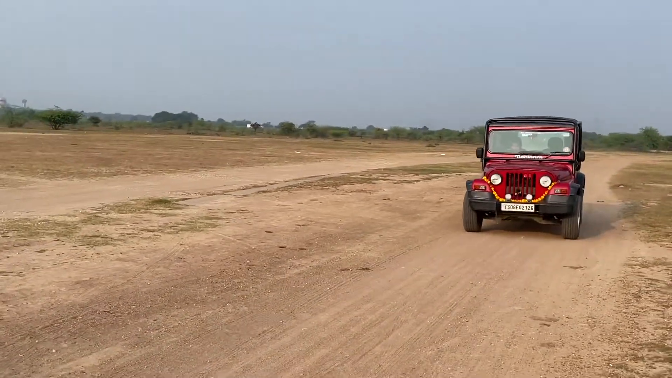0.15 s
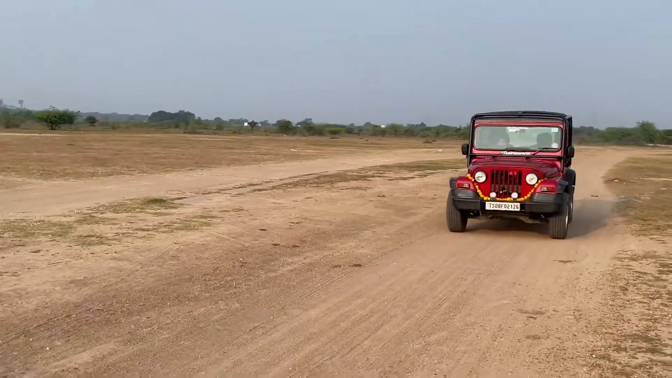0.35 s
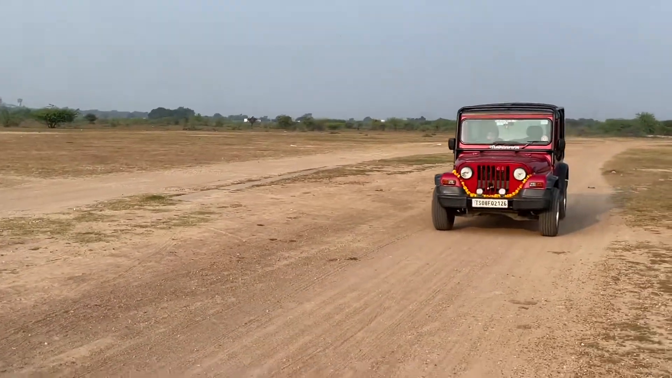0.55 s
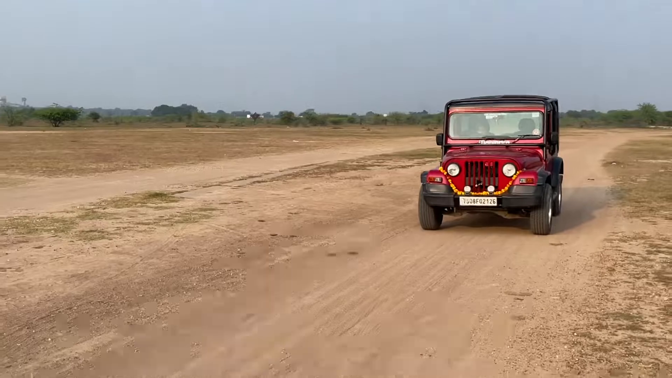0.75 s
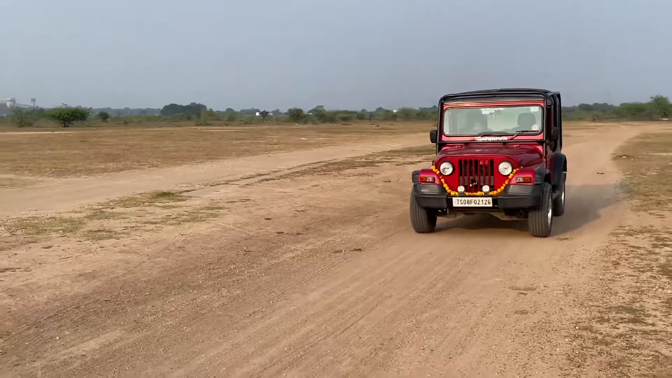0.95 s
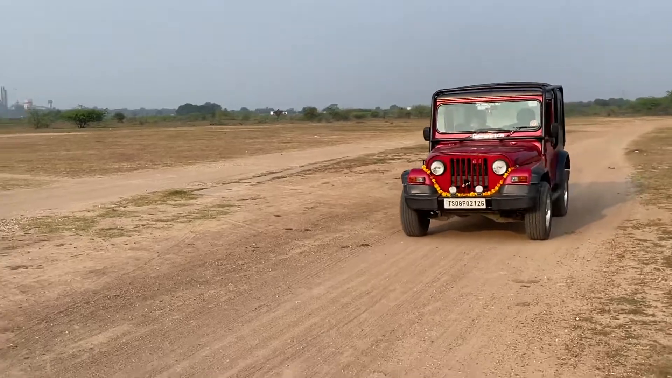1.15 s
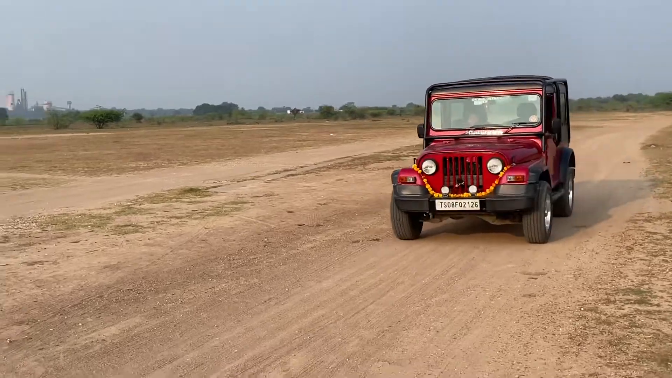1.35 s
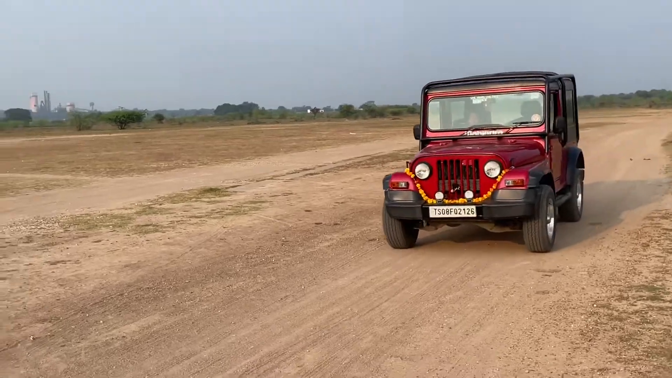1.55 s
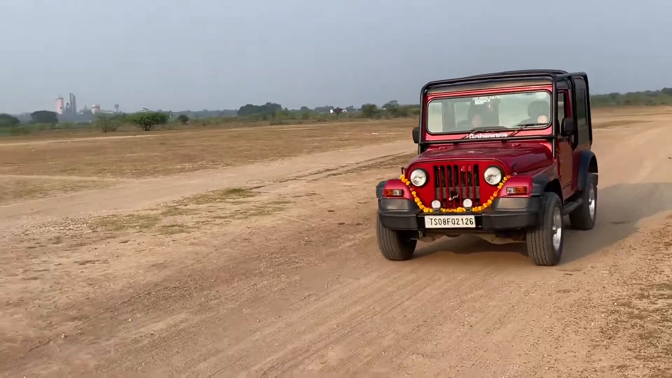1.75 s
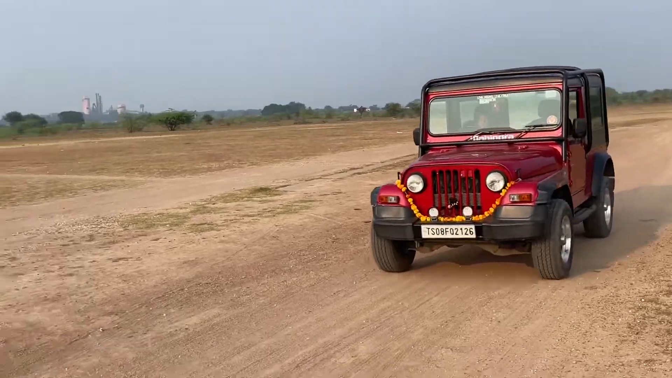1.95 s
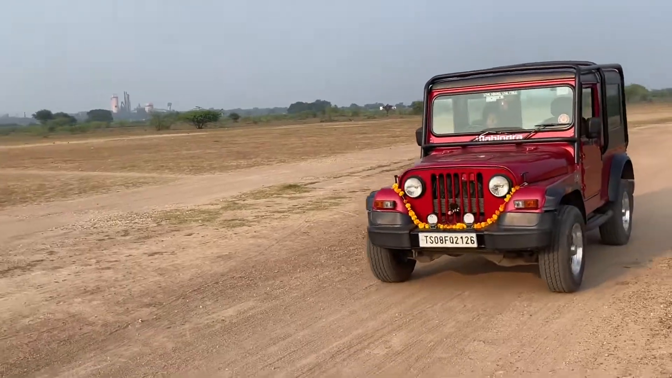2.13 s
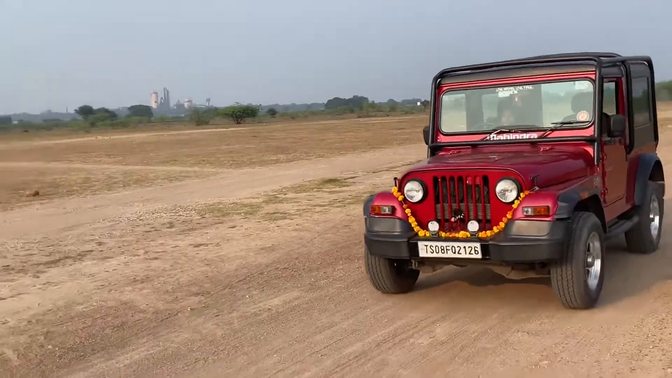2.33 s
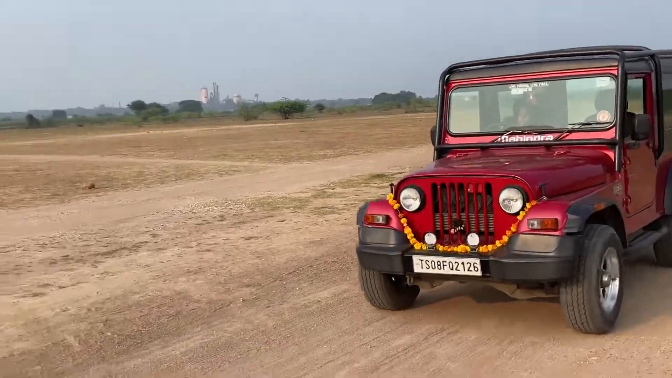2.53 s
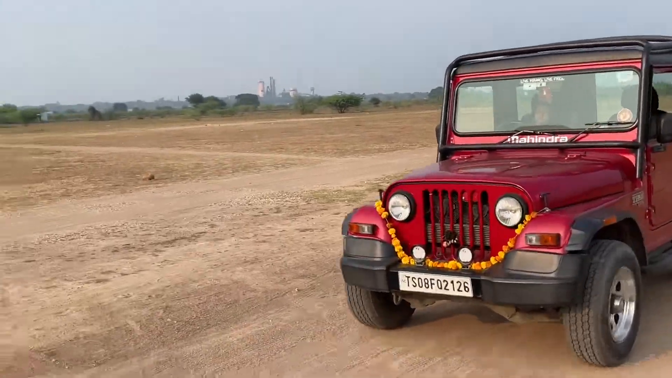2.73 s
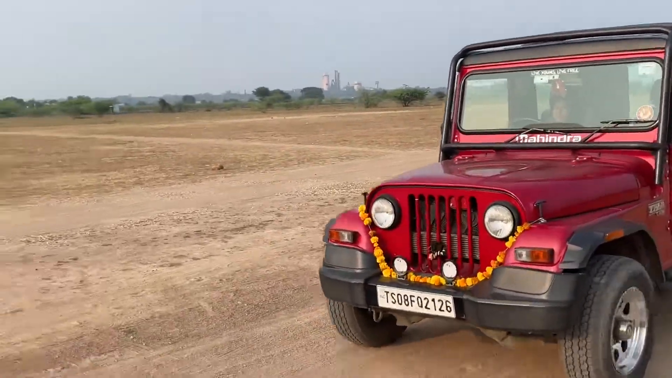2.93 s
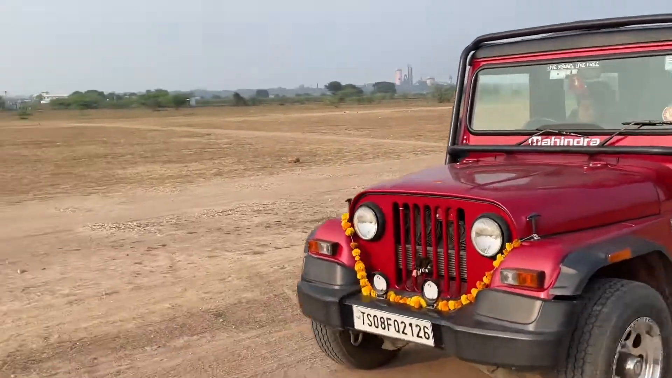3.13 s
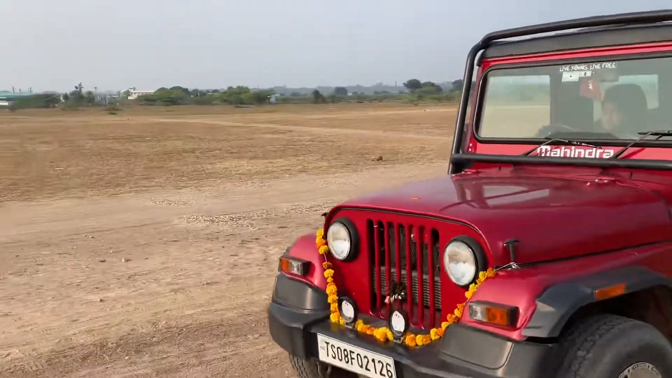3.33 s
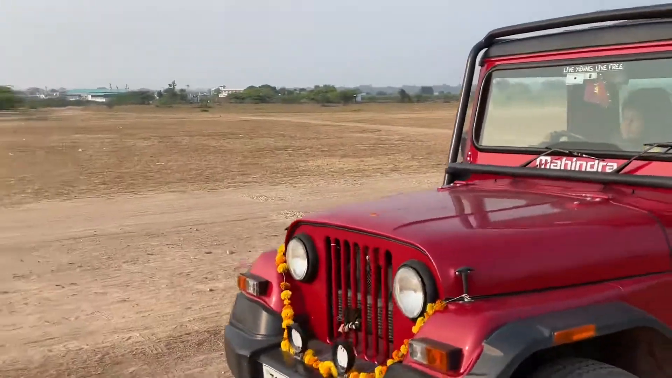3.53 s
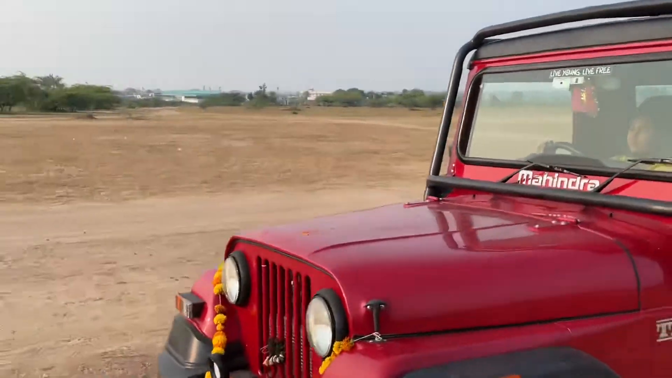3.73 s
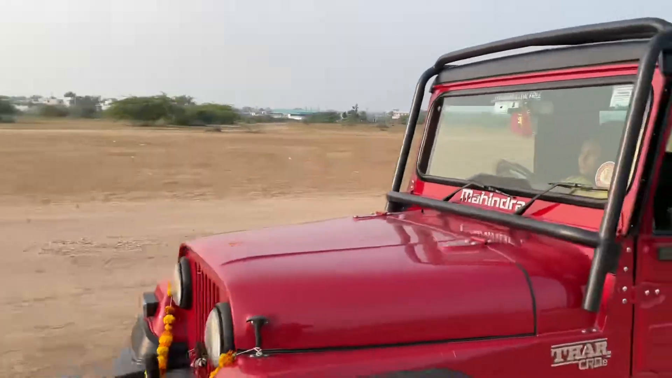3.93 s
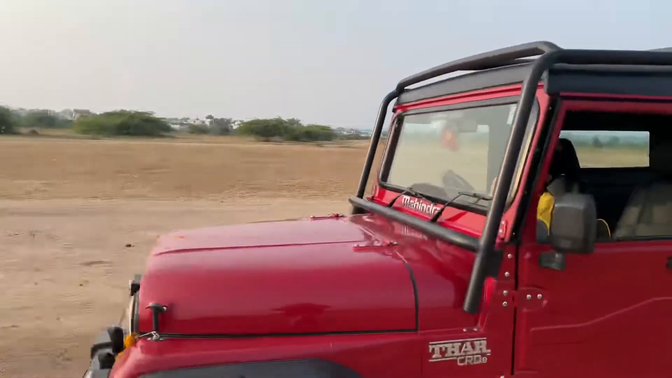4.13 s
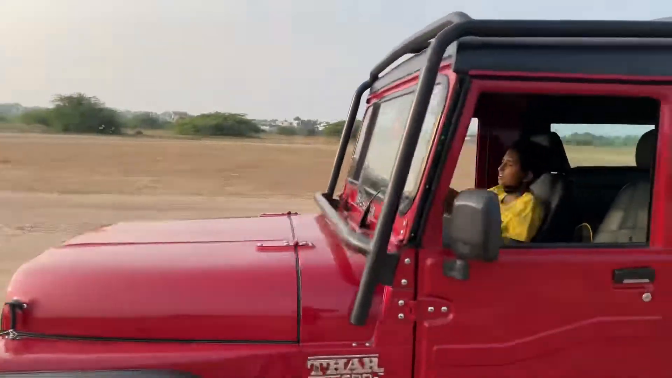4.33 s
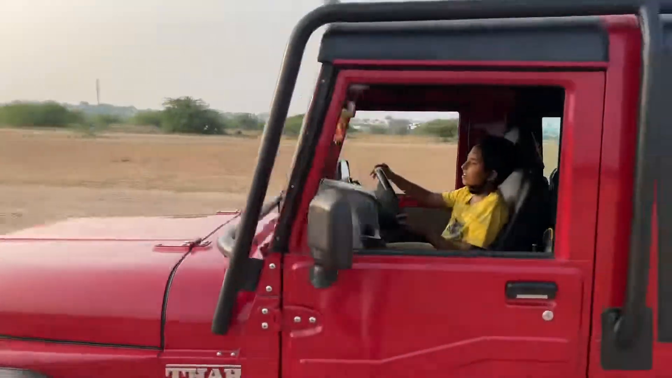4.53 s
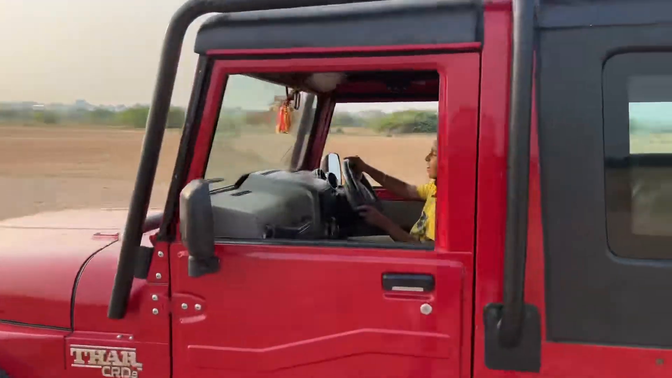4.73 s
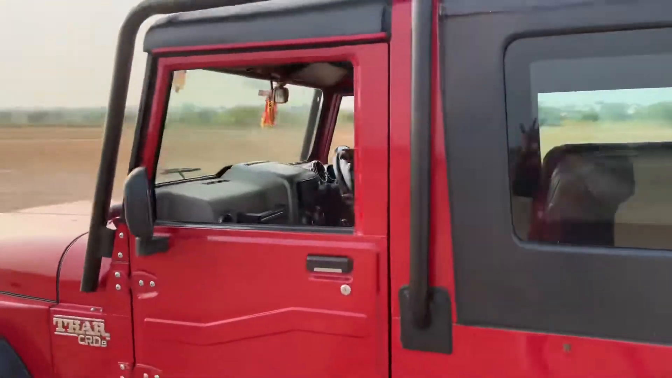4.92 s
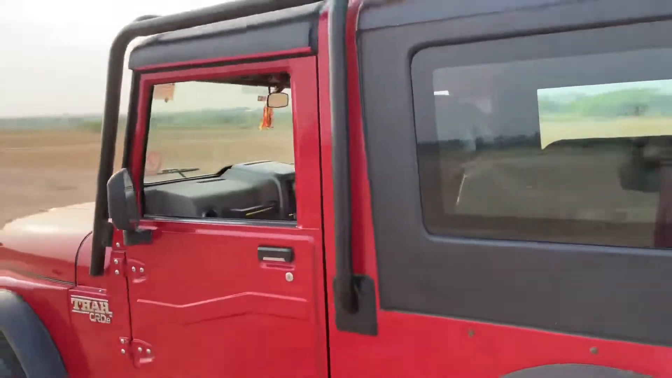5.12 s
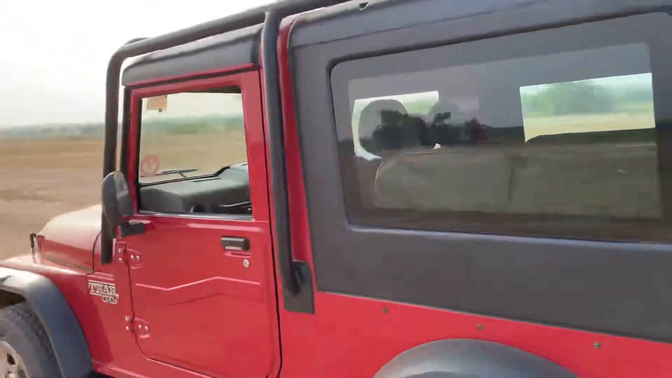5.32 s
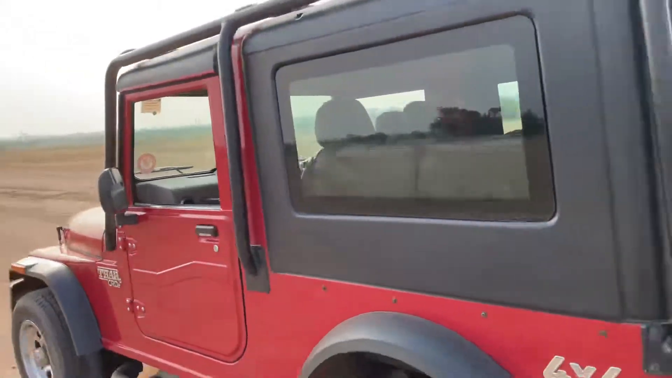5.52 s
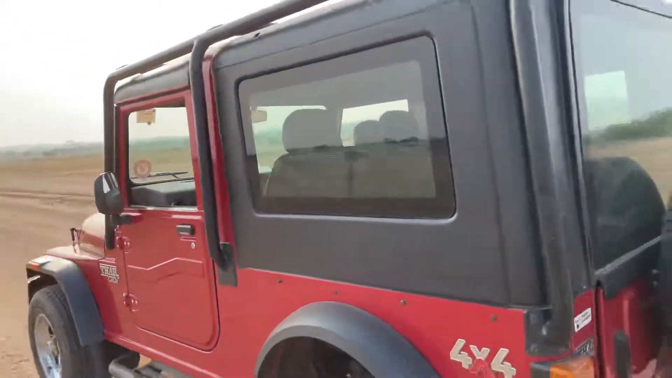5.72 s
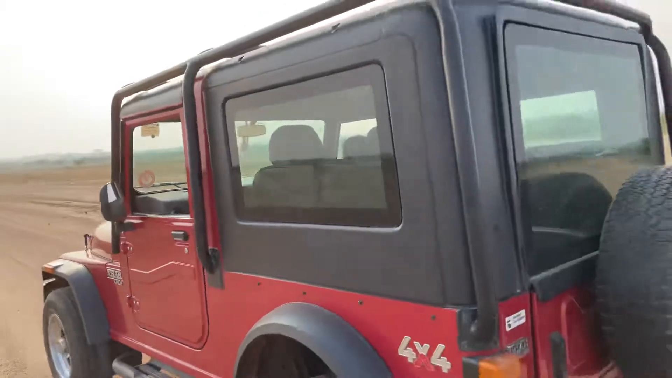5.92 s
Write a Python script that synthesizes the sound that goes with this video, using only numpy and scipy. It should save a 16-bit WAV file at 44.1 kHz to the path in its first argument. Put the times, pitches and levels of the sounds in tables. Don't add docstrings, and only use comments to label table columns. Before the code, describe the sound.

A hand-held phone in an open field hears a four-cylinder diesel come nearer: steady knocking, low exhaust throb, fan and tyre noise. Around four seconds it rolls past at arm's length, the noise brightening and spreading in stereo, with stone ticks, creaks and hard wind slaps. Then the revs fall and the roar recedes.

```python
import sys
import numpy as np
from scipy import signal
from scipy.fft import rfft, irfft
from scipy.io import wavfile
from scipy.ndimage import uniform_filter1d, map_coordinates

SR = 44100
rng = np.random.default_rng(int(sys.argv[2]) if len(sys.argv) > 2 else 0)


def persist_wave(psi):
    counts = np.round(np.clip(psi, -1, 1) * 32767).astype(np.int16)
    wavfile.write(sys.argv[1], SR, np.atleast_2d(counts).T)


def invert_db(level):
    return 10 ** (np.asarray(level, dtype=float) / 20)


N = 263277
TIME_S = np.arange(N) / SR

# time in seconds, firing rate in Hz.
FIRING_RATE = [(0, 52), (.93, 56.7), (1.68, 59.7), (2.18, 61.2), (2.6, 62), (3.18, 62.2), (3.67, 61.5),
               (3.97, 61.3), (4.29, 59.3), (4.72, 56.6), (5.29, 52.8), (5.97, 45.2)]
# time in seconds, engine bay level in dB, tail pipe level in dB.
CLOSENESS = [(0, -46.5, -50), (.3, -46.5, -38), (1, -44.5, -30.5), (1.6, -40.5, -28.5), (2.3, -38, -24),
             (3, -33.5, -21.5), (3.5, -32, -18), (4.1, -35.5, -17), (4.7, -33.5, -19.5), (5.3, -37, -18),
             (5.97, -42.5, -21)]
# time in seconds, lead of first beat, second beat and knock in firings.
PATH_LEADS = [(0, .56, 0, 0), (1, .43, 0, .11), (1.6, .4, 0, .2), (2.3, .36, -.02, .31),
              (2.65, .28, -.09, .4), (3.1, .23, -.14, .25), (4.1, .22, -.19, .1), (4.6, .27, -.2, .1),
              (5.1, .46, -.2, .1), (5.97, .46, -.24, .1)]
SUNG_ORDERS = [2.5, 17.75]
# centre in Hz, width in Hz, gain over the bay level in dB at the grille, at the flank.
RESONANCES = [
    (135, 10, -10, -30),
    (1095, 24, -7, -30),
]
# mode in Hz, t60 in seconds, level in dB at the grille, at the flank.
BLOCK_MODES = [(539, 0.043, -4.5, -3), (687.5, 0.069, -0.5, -4), (812, 0.048, 2, -4.5),
               (1085, 0.018, -12, 2), (1301, 0.03, -1, -3), (1374, 0.04, 2.5, 0.5), (1442, 0.051, -1, -2.5),
               (2253, 0.016, -6, 5.5), (2770, 0.029, -10.5, -2.5)]
UPPER_CYLINDERS_DB = [-4, -12, 0, -9]
MIDDLE_CYLINDERS_DB = [-12, -11, -1, 0]
LOW_CYLINDERS_DB = [-3, 0, -8, -6]
# frequency in Hz, density in dB per Hz.
GRILLE_COLOUR = [(120, 0.5), (300, -3.5), (450, -4), (800, -5.5), (1050, -3.5), (1400, -8.5), (1800, -1),
                 (2300, -6), (3200, -10), (5000, -12.5), (7000, -20.5), (10000, -27.5), (12500, -35),
                 (16000, -35)]
FLANK_COLOUR = [(120, -7.5), (350, 0.5), (700, -8), (1100, 5), (1500, -7), (2000, -3.5), (3200, -7.5),
                (4400, -11), (5400, -11), (7000, -16), (8000, -23.5), (9500, -21), (12500, -31),
                (14000, -40), (16000, -26)]
# start and end in seconds, centre in Hz, width in Hz, gain in dB.
PANEL_BANDS = [(2.75, 3.35, 2850, 120, 3), (2.8, 3.4, 4300, 200, 3), (3.9, 4.3, 2290, 130, 6),
               (3.9, 4.25, 3600, 220, 4), (4.05, 4.9, 3150, 300, -3), (4.3, 4.85, 4380, 200, 5),
               (4.3, 4.9, 5000, 300, -2), (4.55, 4.9, 5800, 200, 2), (4.25, 4.6, 2600, 150, 3),
               (5.0, 5.55, 3550, 180, 4), (5.2, 6.1, 2400, 200, 4), (5.65, 5.88, 2070, 60, 7),
               (5.55, 6.1, 1700, 130, -4), (5.15, 5.48, 1650, 90, 4), (5.4, 6.1, 8900, 600, -5),
               (3.55, 3.75, 560, 90, -3), (5.5, 6.1, 620, 90, 4), (4.55, 4.8, 370, 70, 3),
               (4.5, 4.9, 650, 90, -3), (3.85, 4.1, 1050, 150, 2), (3.0, 3.45, 1150, 150, 3)]
# start and end in seconds, multiple of firing rate, gain over the bay level in dB.
GEAR_LINES = [(.8, 1.03, 38.1, 2), (1.03, 1.36, 38.15, -2), (1.36, 1.55, 38.2, -10), (.8, 1.35, 37.6, -9),
              (.85, 1.3, 38.6, -11), (2.05, 3.15, 38.5, -6), (2.3, 3.6, 38, -8), (2.3, 2.9, 37.5, -12),
              (2.2, 3.4, 32.5, -13), (3.55, 4.0, 38.3, -8), (3.6, 4.1, 37.3, -8), (4.0, 4.3, 38.6, -5),
              (3.95, 4.3, 37.8, 0), (4.65, 4.85, 38.3, -2), (4.4, 4.65, 38, -3), (5.03, 5.25, 37.8, 5),
              (3.95, 4.25, 29, -2), (5.15, 5.45, 32, -1), (5.25, 5.4, 38, -1), (5.46, 5.69, 37.8, 6.5),
              (5.7, 5.85, 38.1, -2)]
# start and end in seconds, multiple of firing rate, level in dB.
BODY_ORDERS = [(.35, .9, 3, -51), (.9, 2.4, 3, -44.5), (2.4, 2.8, 3, -40), (2.8, 4.4, 3, -43),
               (4.5, 5.9, 3, -41), (-.1, .8, 4, -50), (.8, 1.4, 4, -54), (.3, 1.3, 4.5, -52),
               (5.22, 5.53, 5, -38), (4.5, 5.3, 6, -50), (5.6, 5.73, 7, -46), (.9, 2.1, 9, -50),
               (2.9, 3.8, 9, -47), (-.1, .75, 10, -50), (.75, 1.2, 10, -56), (1.55, 2.8, 11, -48),
               (2.8, 3.2, 11, -45), (3.2, 3.65, 11, -47), (3.65, 4.05, 11, -42.5), (.6, 1.3, 12, -48),
               (1.25, 2.8, 12, -53), (-.1, .45, 13, -50), (.45, 1.3, 13, -53), (2, 2.85, 13.25, -49),
               (1.45, 2.9, 13.5, -48), (1.45, 1.7, 14.25, -51), (.5, 1.2, 14.75, -54), (3.8, 4.1, 12, -48),
               (4.55, 4.8, 18, -45)]
# time in seconds, peak in dB, centre in
# Hz, width in Hz, length in seconds.
NOISE_BURSTS = [(1.478, -38, 3000, 4000, .002), (2.14, -52, 12800, 2500, .02), (3.62, -30, 220, 160, .02),
                (3.86, -30, 270, 200, .022), (3.93, -29, 260, 200, .02), (4.62, -41, 4300, 500, .025),
                (4.75, -40, 4350, 400, .025), (5.025, -30, 1100, 500, .01), (5.285, -34, 1650, 250, .012),
                (5.43, -25, 300, 200, .008), (5.495, -24, 180, 120, .012), (5.705, -24.5, 880, 600, .013),
                (5.685, -38, 2100, 100, .015), (5.73, -38, 2090, 100, .02), (5.82, -39, 2060, 100, .012),
                (4.985, -40, 5900, 300, .008), (5.628, -33, 1000, 300, .012), (5.39, -41, 2400, 120, .03),
                (5.53, -42, 2420, 150, .02), (5.855, -26, 2000, 2200, .004), (5.93, -40, 2380, 200, .014)]
# crest in seconds, peak in dB, frequency in Hz, length in seconds.
AIR_SLAPS = [
    (3.64, -24, 139, 0.011),
    (3.703, -18, 91, 0.0099),
    (3.826, -18, 80, 0.013),
    (3.947, -9, 105, 0.0089),
    (3.962, -11, 75, 0.0098),
    (5.311, -17, 83, 0.013),
    (5.5, -21, 150, 0.0082),
    (5.566, -13, 94.5, 0.007),
    (5.61, -22, 101, 0.0082),
    (5.83, -20, 94.7, .013),
]
# frequency in Hz, density in dB per Hz.
WIND_COLOUR = [(25, -44), (33, -25), (45, 8.5), (80, 2.5), (130, -9), (200, -18), (350, -26), (700, -57),
               (2000, -63)]
# time in seconds, buffet level in dB, deep level in dB.
STEADY_WIND = [(0, -55, -61.5), (.9, -35.5, -51.5), (3.4, -42, -46), (4.3, -30, -55), (5.0, -35, -57),
               (5.97, -30, -61)]
# centre in seconds, half length in seconds, buffet level in dB, deep level in dB.
WIND_GUSTS = [(0.793, 0.046, -53, -68), (1.97, 0.044, -45, -43), (2.243, 0.3, -43, -61),
              (2.48, 0.017, -35, -42), (2.56, 0.033, -36, -45), (2.717, 0.03, -59, -47),
              (3.04, 0.06, -57, -46), (3.63, 0.048, -26, -42), (3.803, 0.067, -29, -43),
              (3.894, 0.037, -21.5, -50), (3.95, 0.05, -29.5, -35.5), (4.12, 0.08, -39, -42),
              (4.369, 0.096, -33, -50), (4.555, 0.097, -27.5, -51), (4.686, 0.032, -46, -36),
              (4.787, 0.052, -27, -41), (4.965, 0.1, -29, -41), (5.144, 0.05, -23.5, -44),
              (5.322, 0.087, -24, -43.5), (5.43, 0.033, -25, -54), (5.59, 0.16, -28.5, -45),
              (5.844, 0.064, -39, -46)]
PHASE_STEP_HZ = [6300, 7625, 8925, 10400, 12750, 13800]

FLANK_S, FLANK_SPAN_S, TAIL_S, TAIL_SPAN_S = 4.02, .13, 5.0, .12
BAY_PAST_S, DOOR_PAST_S = 4.3, 4.98


def columns(table):
    s, *rest = np.transpose(table)
    return [np.interp(TIME_S, s, c) for c in rest]


def unit(x):
    return x / np.sqrt(np.mean(x ** 2))


def shape_db(table, hz):
    f, db = np.transpose(table)
    return np.interp(np.log(np.maximum(hz, 1)), np.log(f), db)


def walk(rate):
    k = int(SR / rate)
    held = np.repeat(rng.standard_normal(N // k + 1), k)
    return unit(uniform_filter1d(uniform_filter1d(held, k), k)[:N])


def band(x, lo_hz, hi_hz, order=2):
    edges_hz = [max(lo_hz, 20), min(hi_hz, 20000)]
    return signal.sosfiltfilt(signal.butter(order, edges_hz, "bandpass", fs=SR, output="sos"), x)


def step(at_s, span_s):
    return .5 + .5 * np.tanh(2 * (TIME_S - at_s) / span_s)


def bump(at_s, span_s):
    return np.exp(-((TIME_S - at_s) / span_s) ** 2)


def late(x, lag):
    return map_coordinates(x, [np.arange(N) - lag], order=3, mode="nearest")


def exhaust(hz, turns, flank, near_db, pipe_db):
    first_db = pipe_db - 22 * step(TAIL_S + 0.021, TAIL_SPAN_S)
    ahead_db = -7.5 - 3.5 * np.clip(59 - hz, 0, 3)
    null_db = -11 * bump(5.47, .13)
    second_db = pipe_db + ahead_db + flank * (-3 - ahead_db) + null_db
    first, second = turns + np.array(columns(PATH_LEADS)[:2])
    out = invert_db(first_db) * np.cos(2 * np.pi * first)
    out = out + invert_db(second_db) * np.cos(4 * np.pi * second - .4)

    sung_db = near_db[0] + 0.76 * (near_db - near_db[0])
    coarse_hz, coarse_flank = hz[::64], flank[::64]
    for k in SUNG_ORDERS:
        sung = 0
        for centre_hz, width_hz, grille_db, flank_db in RESONANCES:
            gain = invert_db(grille_db + coarse_flank * (flank_db - grille_db))
            sung = sung + gain * np.exp(-((k * coarse_hz - centre_hz) / width_hz) ** 2)
        swell = np.repeat(sung, 64)[:N] * invert_db(sung_db + 1.2 * walk(14))
        out = out + swell * np.sin(2 * np.pi * k * turns + .03 * k * walk(10))
    return np.sqrt(2) * out


def knock(turns, flank, jitter_s=0.00025, scatter_db=1.2):
    at = np.flatnonzero(np.diff(np.floor(turns)) > 0)
    jitter, scatter = rng.standard_normal((2, len(at)))
    place = np.clip(at + (jitter_s * SR * jitter).astype(int), 0, N - 1)
    cylinder = turns[at + 1].astype(int) % 4
    strengths_db = np.take([UPPER_CYLINDERS_DB, MIDDLE_CYLINDERS_DB, LOW_CYLINDERS_DB], cylinder, axis=1)
    blows = np.zeros((3, N))
    blows[:, place] = invert_db(strengths_db + scatter_db * scatter)
    burn = signal.lfilter([1], [1, -np.exp(-1 / (0.0018 * SR))], blows)
    blows = blows + (0.0077 + 0.037 * flank) * burn * rng.standard_normal(N)
    blows = signal.lfilter(signal.windows.hann(27), [1], blows)
    out = 0
    for hz, t60, grille_db, flank_db in BLOCK_MODES:
        pole = np.exp(2j * np.pi * hz / SR - np.log(1000) / (max(t60, .003) * SR))
        poles = np.convolve([1, -pole], [1, -pole * np.abs(pole) ** 3])
        blow = blows[int(hz < 1000) + int(hz < 1340)]
        ring = unit(signal.lfilter([1], poles, blow).imag)
        out = out + invert_db(grille_db + flank * (flank_db - grille_db)) * ring
    return unit(out)


def roar(turns, flank, patchy_db=1.08, gate=0.095):
    hz, s, z = signal.stft(rng.standard_normal(N), SR, nperseg=512)
    side = np.interp(s, TIME_S, flank)
    slide = 0.18 * (np.tanh(2 * (s - 5.14) / 0.47) + .5) / 2
    flank_hz = hz[:, None] + np.outer(np.minimum(hz, 2500), slide)
    db = np.outer(shape_db(GRILLE_COLOUR, hz), 1 - side) + side * shape_db(FLANK_COLOUR, flank_hz)

    def add_swell(gain_db, weight, at_s, span_s):
        return gain_db * np.outer(weight, np.exp(-((s - at_s) / span_s) ** 2))

    dip_hz = 1750 + 31 * s + 258 * np.interp(s, TIME_S, step(3.9, 0.44))
    db = db - 13.5 * (1 - side) * np.exp(-((hz[:, None] - dip_hz) / 110) ** 2)
    db = db + add_swell(2.5, np.clip(hz / 2000 - 2, 0, 1), 3.8, 0.62)
    db = db + add_swell(-8.5, np.exp(-((hz - 385) / 70) ** 2), 2.94, .5)
    for start_s, end_s, at_hz, width_hz, lift_db in PANEL_BANDS:
        passing = (np.tanh((s - start_s) / 0.09) - np.tanh((s - end_s) / 0.074)) / 2
        db = db + lift_db * np.outer(np.exp(-((hz - at_hz) / width_hz) ** 2), passing)
    flutter = np.interp(s, TIME_S, walk(36))
    db = db + 1.2 * np.outer(np.clip(hz / 3000 - 1.9, 0, 1), flutter)

    patches = uniform_filter1d(rng.standard_normal(z.shape), size=6, axis=0)
    patches = unit(uniform_filter1d(patches, size=7, axis=1))
    coloured = z * invert_db(db + patchy_db * patches) * (hz[:, None] > 100)
    out = signal.istft(coloured, SR)[1][:N]
    out = out * (1 + gate * np.cos(2 * np.pi * turns) + 0.06 * np.cos(np.pi / 2 * turns))
    return out / np.std(band(out, 2670, 5800))


def whine(turns, near_db):
    blur = np.cumsum((8 + 8 * bump(3.9, .4)) * walk(150)) / SR
    throb_db = .7 * walk(40)
    lines = 0
    for start_s, end_s, k, db in GEAR_LINES:
        present = step(start_s, .1) - step(end_s, .1)
        lines = lines + invert_db(db) * present * np.sin(2 * np.pi * (k * turns + blur))
    return lines * invert_db(near_db + throb_db) * np.sqrt(2)


def hums(turns):
    sway, swell_db = .012 * walk(8), -1 + 1.3 * walk(20)
    lines = 0
    for start_s, end_s, k, db in BODY_ORDERS:
        present = step(start_s, .12) - step(end_s, .12)
        lines = lines + invert_db(db) * present * np.sin(k * (2 * np.pi * turns + sway) + k * k)
    return np.sqrt(2) * invert_db(swell_db) * lines


def gravel(per_s=700, spread_db=2.5):
    chance = rng.random((2, N))
    present = chance[0] < per_s / SR * invert_db(4.0 * walk(14))
    size = invert_db(-spread_db * np.log(1 - chance[1]))
    sign = np.sign(chance[1] * 1000 % 1 - .5)
    return unit(band(present * size * sign, 1200, 9000, order=1))


def bursts():
    out = np.zeros(N)
    for s, db, hz, width_hz, length in NOISE_BURSTS:
        shape = np.exp(-(np.arange(-1500, 1500) / SR / length) ** 2)
        grain = band(rng.standard_normal(3000), hz - width_hz / 2, hz + width_hz / 2) * shape
        at = int(s * SR)
        out[at - 1500:at + 1500] += invert_db(db) * unit(grain) * np.sqrt(np.mean(shape ** 2))
    return out


def thumps():
    out = 0
    for s, db, hz, length in AIR_SLAPS:
        out = out + invert_db(db) * np.cos(2 * np.pi * hz * (TIME_S - s)) * bump(s, length)
    return out


def wind(alike=.6):
    colour = invert_db(shape_db(WIND_COLOUR, np.fft.rfftfreq(N, 1 / SR)))
    mid, side = (unit(irfft(rfft(rng.standard_normal(N)) * colour, N)) for _ in range(2))
    pair = np.sqrt(1 + alike) * mid + np.sqrt(1 - alike) * side * np.array([[1], [-1]])
    buffet, heave = invert_db(np.array(columns(STEADY_WIND)))
    for s, half_s, buffet_db, deep_db in WIND_GUSTS:
        gust = bump(s, half_s)
        buffet = buffet + gust * invert_db(buffet_db)
        heave = heave + gust * invert_db(deep_db)
    deep = band(pair, 14, 93.5, order=3)
    return ((pair - deep) * buffet * invert_db(5.0) + deep * heave * invert_db(12.0)) * invert_db(1.8 * walk(18))


def right_port(right, flank):
    engine_lead = 3 + 6 * step(BAY_PAST_S, .3)
    hiss_lead = 31 + 9 * step(DOOR_PAST_S, .2)
    low, mid, hiss = (band(right, a, b, order=5) for a, b in [(20, 1300), (1300, 3600), (3600, 6500)])
    swing = np.minimum(4 * flank, 1) * engine_lead
    wrap = .78 * flank * (1 - .7 * step(DOOR_PAST_S + .14, .12))
    mid_share = .7 * (1 - step(DOOR_PAST_S, .1))
    far = late(np.sqrt(mid_share) * mid + hiss, hiss_lead + .7 * walk(7))
    near_mid = np.sqrt((1 - mid_share * wrap) / (1 - wrap)) * late(mid, swing)
    near = near_mid + late(hiss, -.7 * flank)
    rest = right - low - mid - hiss
    return rest + late(low, .75 * swing) + np.sqrt(wrap) * far + np.sqrt(1 - wrap) * near


def scene():
    hz = columns(FIRING_RATE)[0]
    turns = np.cumsum(hz) / SR + .04
    near_db, pipe_db = columns(CLOSENESS)
    flank = step(FLANK_S, FLANK_SPAN_S)
    knock_db = -39.5 + 0.52 * (near_db - near_db[0]) + 4 * bump(4.4, 0.18)
    knock_db = knock_db - 7 * bump(3.45, 0.7)
    bay = turns + columns(PATH_LEADS)[2]
    noisy = invert_db(near_db) * roar(bay, flank) + invert_db(knock_db) * knock(bay, flank)
    noisy = noisy + invert_db(near_db - 14.0 + 3.0 * step(TAIL_S, .3)) * gravel()
    clear = exhaust(hz, turns, flank, near_db, pipe_db) + whine(turns, near_db) + hums(turns)
    clear = clear + bursts() + thumps()

    other = invert_db(near_db + 1.8) * roar(bay, flank)
    share = .63 * flank ** 2
    left = clear + noisy
    swapped = (np.sqrt(1 - share) - 1) * noisy + np.sqrt(share) * other
    right = right_port(left + band(swapped, 200, 11000, order=5), flank)
    shade = 0.23 * np.array([band(left, 1300, 1390), -band(right, 480, 6400)])
    shade = shade + 0.2 * flank * np.array([band(left, 570, 910), -band(right, 520, 870)])
    echo = 0.074 * band(other, 100, 5500, order=5) * np.array([[1], [-1]])
    pair = np.array([left, right]) + shade + echo + wind()
    bass_db = np.interp(TIME_S, [0, FLANK_S, TAIL_S], (-1.3, 0, 1.1))
    return pair + (invert_db(np.array([bass_db, -bass_db]) / 2) - 1) * band(pair, 20, 560)


def roll_off(x):
    return signal.sosfilt(signal.butter(12, 15800, fs=SR, output="sos"), x)


def record(dry):
    pad = 2048
    size = N + 2 * pad
    wide = np.pad(dry, [(0, 0), (pad, pad)], "reflect") * signal.windows.tukey(size, 2 * pad / N)
    f = np.fft.rfftfreq(size, 1 / SR)
    slip = np.pi / 4 * sum(np.clip((f - edge) / 160 + .5, 0, 1) for edge in PHASE_STEP_HZ)
    x = irfft(rfft(wide) * np.exp(1j * np.array([-slip, slip])), size)[:, pad:-pad]
    x = x * np.clip((N - np.arange(N)) / 200, 0, 1)
    return roll_off(x)


dry = scene()
out = record(dry)
persist_wave(out)
```